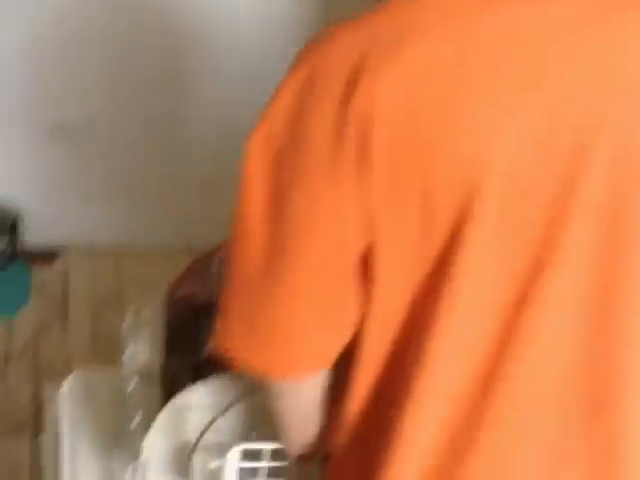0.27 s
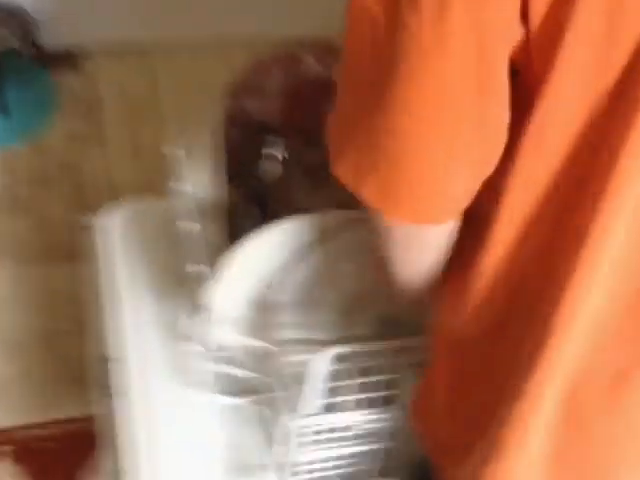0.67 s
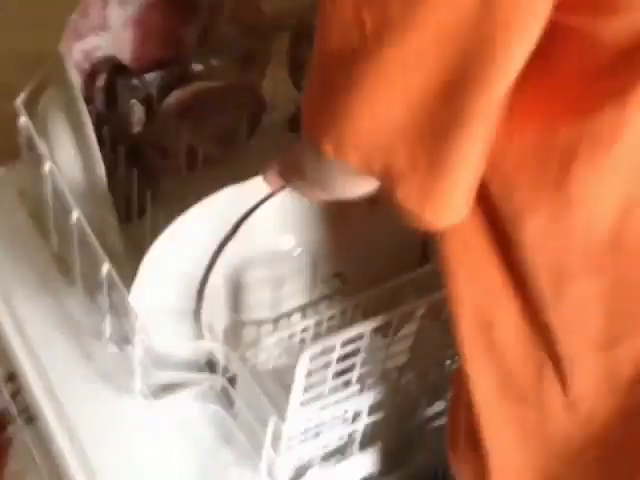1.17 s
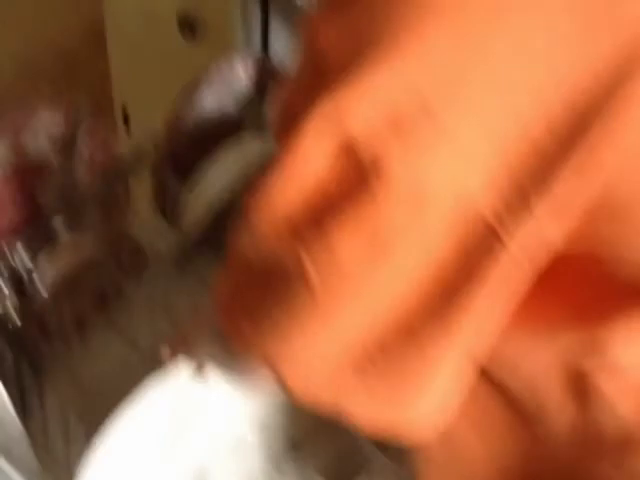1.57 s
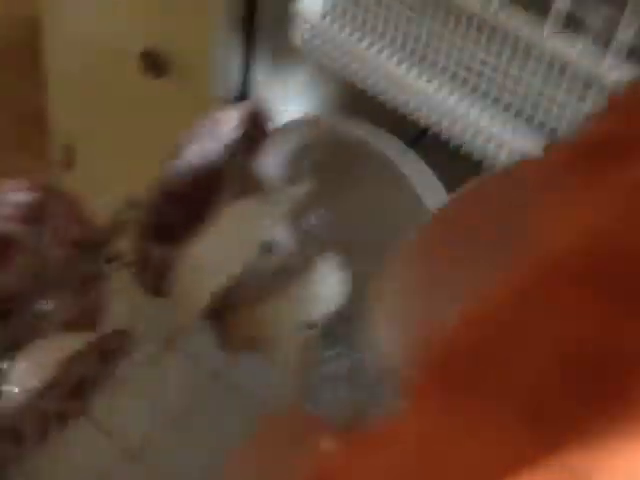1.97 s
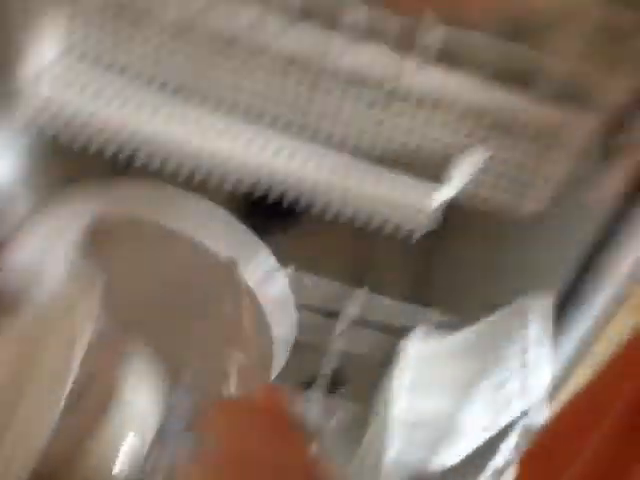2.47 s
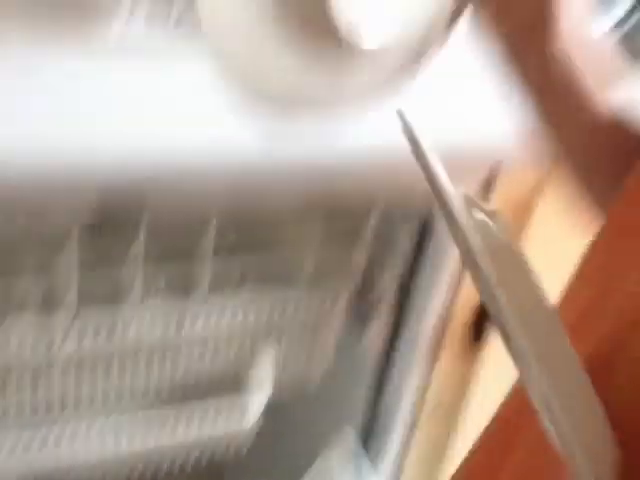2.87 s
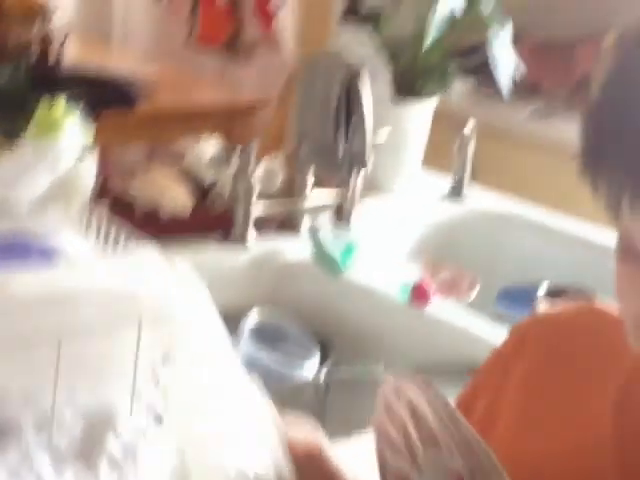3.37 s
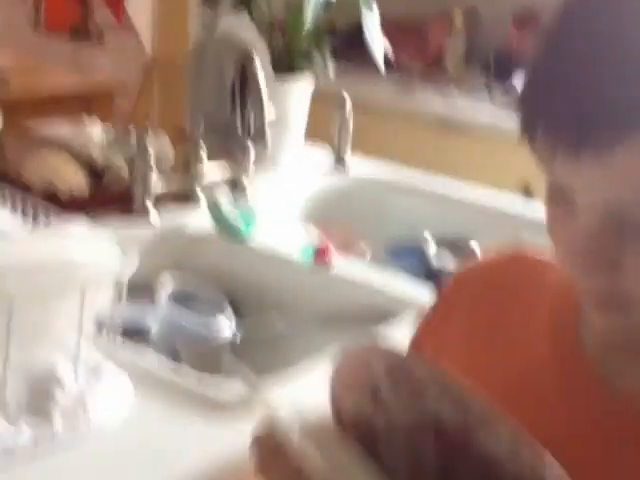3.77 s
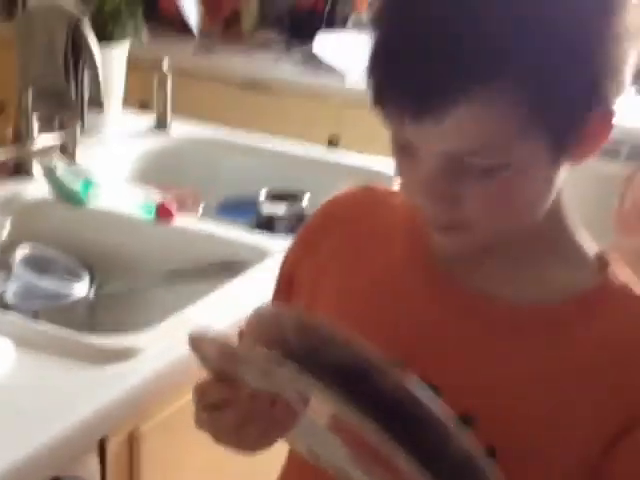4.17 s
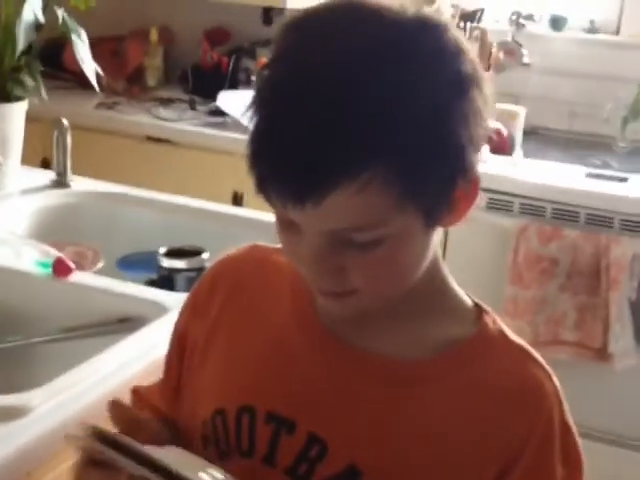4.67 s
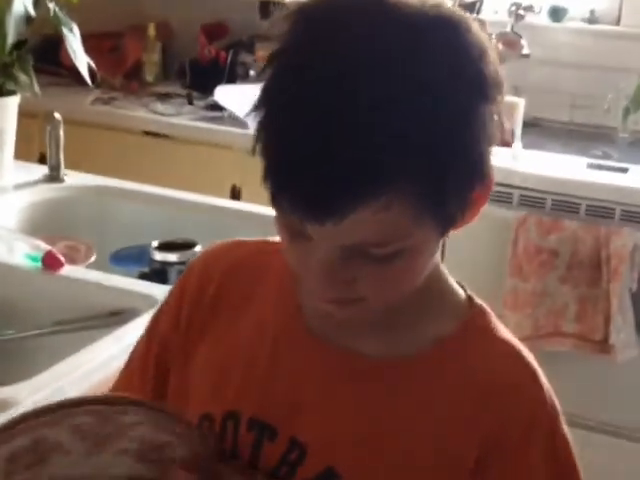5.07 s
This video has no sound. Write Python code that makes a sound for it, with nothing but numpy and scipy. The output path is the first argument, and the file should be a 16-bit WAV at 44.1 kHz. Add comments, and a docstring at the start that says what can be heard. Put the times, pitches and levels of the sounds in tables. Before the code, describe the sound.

Dishes being unloaded by hand in a home kitchen: a rattly rack knock, clustered ceramic clinks with short ringing, one sharp bowl strike, a near-quiet moment with soft sleeve swishes, then two strong clacks of plates being stacked and faint china touches. Recorded close on a small, thin-sounding microphone, with lively short reverberation and a faint rumble that lessens.

```python
"""Stacking china in a small kitchen

China plates are lifted out of a dishwasher rack and stacked by hand. Each contact is a clack of
filtered noise plus a ring of decaying sine pairs. Loose dishes chatter in runs of light contacts.
The rack thuds and hands or sleeves brush past, both as shaped noise. Echoes made of random pulses
and fading noise form the hard room, over a low background rumble.
"""
import sys
import numpy as np
from scipy import signal
from scipy.io import wavfile

SR = 44100
rng = np.random.default_rng(int(sys.argv[2]) if len(sys.argv) > 2 else 0)


def waveform_to_disk(signal):
    """Save audio, clipped to [-1, 1], as 16-bit WAV at the path in sys.argv[1]."""
    frames = np.transpose(np.atleast_2d(signal))
    scaled = np.clip(frames, -1, 1) * 32767
    samples = np.round(scaled).astype(np.int16)
    wavfile.write(sys.argv[1], SR, samples)


N = 234719  # length in samples

# Colour of the house background. Each row: frequency in Hz, level in dB per Hz.
BACKGROUND_COLOUR = [(30, -32), (70, -19), (110, -9), (170, -1), (280, 0), (420, -5), (600, -11),
                     (1200, -15), (2500, -17), (4000, -21), (6500, -24), (9000, -34), (15500, -35)]
# How the background level moves. Each row: time in seconds, level in dB.
BACKGROUND_LEVEL = [(0, -56.5), (1.9, -56), (2.9, -61.5), (5.3, -66)]

# Colour of dry friction. Each row: frequency in Hz, level in dB per Hz.
RUB_COLOUR = [(350, -30), (600, -1.5), (775, 0), (974, -7.5), (1990, -5), (3190, -7.5), (6690, -6),
              (10600, -25.5), (15000, -21.5)]
# A hand or sleeve brushing past the dishes. Each row: start in seconds, length in seconds,
# level in dB, rise in seconds, fade in dB per second.
RUB_STROKES = [(0, 0.18, -66, 0.012, 3), (0.985, 0.041, -62, 0.003, 39.5), (3.038, 0.083, -56, 0.0088, 3.5),
               (3.119, 0.22, -59.5, 0.039, 18.5), (3.692, 0.058, -58.5, 0.048, 2),
               (4.338, 0.058, -52.5, 0.027, 38)]

# Loose dishes jostling in runs of light ticks. Each row: start in seconds, length in seconds,
# dish name, relative level in dB, brightness in dB per octave.
JOSTLE_RUNS = [(0.036, 0.13, "loose plate", -49, -4), (0.172, 0.025, "loose plate", -42.5, 2),
               (0.337, 0.081, "rack", -55, -4.5), (0.551, 0.053, "rack", -43, -4),
               (1.799, 0.14, "plate", -44.5, -6), (1.994, 0.051, "bowl", -50.5, 0),
               (2.109, 0.06, "bowl", -48.5, 0), (4.21, 0.051, "side plate", -50.5, 1)]
TICKS_PER_S, TICK_FADE_DB_PER_S, TICK_SPREAD_DB = 50, 47.5, -1.5  # uneven ticks that die down
TICK_SOFT_DB, TICK_RISE_S = 3, 0.023  # a jostle starts gently and soon swells
TICK_RING_DB, TICK_CHATTER_S = -7.5, 0.012  # light contacts are loose and ring faintly

# Soft, dull knocks on the rack or on a dish in the hand. Each row: time in seconds, relative level in dB.
SOFT_KNOCKS = [(0.055, -40), (0.163, -42), (0.566, -43), (0.612, -19.5), (0.986, -49.5), (1.774, -45),
               (2.019, -50), (3.015, -45.5), (3.942, -44.5)]
# Colour of a thud. Each row: frequency in Hz, level in dB per Hz.
THUD_COLOUR = [(40, -34.5), (95, -14.5), (155, -4), (220, -2.5), (330, -6), (600, -12.5), (2000, -31.5),
               (12000, -60.5)]
# Dishes whose clear contacts also shake the rack: a list of dish names.
DISHES_IN_RACK = ("saucer", "plate", "rim", "bowl", "side plate")
RACK_SHARE_DB = -25.5  # added to the listed level of a contact to get the listed level of its thud

# Clear contacts. Each row: time in seconds, dish name, relative level in dB,
# relative ring against clack in dB, brightness in dB per octave, chatter length in seconds.
CLEAR_CONTACTS = [ (0.056, "loose plate", -54, 5, -5, 0.0081), (0.111, "loose plate", -53, -9, 1.5, 0.0091),
                  (0.444, "side plate", -52.5, -9, 3.5, 0.0038), (0.585, "rack", -45, 1, 2, 0.029),
                  (0.602, "rack", -23, -6, 2.5, 0.008), (0.61, "rack", -17.5, -12.5, 1, 0.0095),
                  (0.62, "rack", -17, -11, 2, 0.022), (0.648, "rack", -25, -5, 3, 0.021),
                  (0.684, "rim", -36, 0, 1, 0.019), (0.759, "side plate", -39.5, -13, 6.5, 0.014),
                  (1.19, "pair", -33, -18.5, -1, 0.0056), (1.252, "loose plate", -48.5, 1, -2.5, 0.0078),
                  (1.352, "saucer", -21.5, -6, 0, 0.0056), (1.364, "saucer", -22.5, -5, -1, 0.0074),
                  (1.493, "plate", -27.5, 3.5, 0.5, 0.0066), (1.511, "plate", -19.5, -2, 0.5, 0.026),
                  (1.554, "plate", -23, -10, -0.5, 0.019), (1.669, "rim", -23.5, -9, 2, 0.011),
                  (1.687, "rim", -27.5, 1.5, -1.5, 0.019), (1.719, "rim", -28.5, -5.5, 1, 0.0077),
                  (1.754, "rim", -34, 1, -3, 0.013), (2.028, "saucer", -39, -12.5, 0, 0.01),
                  (2.164, "rim", -39.5, -4.5, -3, 0.006), (2.269, "bowl", -42, 8.5, 3.5, 0.0093),
                  (2.282, "bowl", -18, -6.5, 2.5, 0.0079), (2.306, "bowl", -26, 2.5, 0, 0.012),
                  (2.321, "bowl", -30, -4.5, 1, 0.0086), (2.49, "side plate", -35, -3.5, -1, 0.005),
                  (2.551, "stack", -42.5, -13.5, -6.5, 0.0064), (2.603, "saucer", -45, -16.5, -5, 0.01),
                  (2.642, "bowl", -50.5, -20.5, 0, 0.014), (2.703, "deep plate", -47.5, -2.5, -4, 0.009),
                  (3.261, "small plate", -38.5, -4.5, -1.5, 0.013),
                  (3.942, "pair", -18, -4.5, -1.5, 0.0067), (3.957, "pair", -27.5, 0, 0.5, 0.011),
                  (4.016, "pair", -29, -5.5, -1, 0.0049), (4.476, "pair", -31.5, -2, -2, 0.01),
                  (4.502, "stack", -19, -6, -1, 0.0068), (4.54, "stack", -20, -8, -0.5, 0.024),
                  (4.603, "stack", -33.5, -6, -2, 0.017), (4.8, "top plate", -50.5, -1.5, -5.5, 0.017),
                  (4.839, "stack", -46.5, -6, -7, 0.018), (4.864, "stack", -51.5, -2, -4, 0.0077),
                  (4.993, "stack", -52, -6, -2, 0.0072), (5.017, "stack", -44.5, -4.5, -1, 0.0069),
                  (5.032, "top plate", -36, -6, -2, 0.011), (5.221, "stack", -49.5, -4, -4.5, 0.0054),
                  (5.277, "loose plate", -52, 1.5, -5, .018)]
# Dense, quickly damped modes of each dish, by name. Each row: frequency in Hz, level in dB per Hz.
CLACK_COLOUR = { "rack": [(53, -48), (90, -24), (179, 3), (300, -2.5), (420, -3), (515, 1), (653, -5.5),
                (883, -1), (1190, -10.5), (2770, -8.5), (4080, -15.5), (4640, -12.5), (9240, -29),
                (14200, -51), (15500, -32)], "saucer": [(150, -57), (250, -32.5), (635, -15.5), (929, -5.5),
                (1160, -13.5), (1920, -5.5), (2900, -9.5), (4240, -11.5), (4790, -11), (5220, -25),
                (6210, -12), (13700, -47.5), (15500, -49)], "plate": [(150, -52), (250, -27), (795, -9.5),
                (897, -5.5), (1790, -12.5), (2020, -6), (2950, -12), (3220, -8), (5600, -9.5),
                (7000, -12.5), (8770, -18), (9230, -47), (15500, -32.5)], "rim": [(150, -50.5), (250, -34),
                (593, -15.5), (1760, -15), (2620, -7.5), (3330, -18.5), (3510, -4), (4100, -12.5),
                (5690, -13.5), (9230, -32.5), (15500, -44.5)], "bowl": [(120, -38), (200, -34), (618, -8.5),
                (769, -13), (1010, -5.5), (1560, -15.5), (2020, -3), (2300, -14.5), (4750, -13),
                (5700, -15), (15500, -45.5)], "pair": [(180, -60), (300, -33.5), (526, -27), (562, -17.5),
                (937, -3), (1240, -13), (1940, -7.5), (2210, -8.5), (2610, -8.5), (3280, -8), (3450, -5),
                (3940, -6.5), (6900, -11.5), (9290, -24.5), (15500, -42.5)], "stack": [(180, -57.5),
                (300, -35), (620, -14), (794, -9), (922, -5.5), (1180, -14), (1780, -8), (2790, -10),
                (3570, -9), (4210, -18.5), (4570, -3), (5050, -24.5), (6150, -16), (8140, -32), (9140, -49),
                (15500, -54)]}
# The clack shared by the remaining, lightly struck plates. Each row: frequency in Hz, level in dB per Hz.
PLAIN_CLACK_COLOUR = [(150, -61.5), (250, -22.5), (600, -24), (961, -13.5), (1500, -18.5), (2760, -18),
                      (4790, -21), (7000, -30), (15500, -61)]
# Clear ringing modes of each dish, by name. Each row: frequency in Hz, relative level in dB.
RING_MODES = { "rack": [(224, -4), (340, -3), (514, 0), (612, -3), (875, -6), (997, -5), (1898, -7),
              (2141, -6), (2402, -6), (2572, -6), (2715, -4), (2814, -4), (3099, -4), (3137, -3),
              (3494, -6), (4507, -4), (4540, -3), (4660, -1), (5428, -10), (6150, -6), (6831, -5),
              (8214, -19)], "saucer": [(847, -12), (950, -11), (1005, -9), (1079, -12), (1230, -13),
              (1958, -12), (2145, -14), (2550, -11), (2865, -5), (2981, -9), (3305, -12), (3636, -12),
              (3854, -11), (4638, 1.5), (4945, -6), (5585, -12)], "plate": [(879, -13), (1003, -14),
              (1975, -11), (2036, -8), (2528, -4), (2577, -5), (2710, -1), (2950, -4), (2975, 0),
              (3494, -10), (3622, -8), (4506, -12), (4608, -11), (4759, -14), (5190, -11), (5280, -12),
              (6059, -16), (6779, -11), (6837, -5), (8761, -15)], "rim": [(1003, -20), (1280, -20),
              (1918, -12), (2017, -15), (2560, -7), (2713, -11), (2942, -10), (3500, 2), (3572, -13),
              (4486, -13), (4546, -9), (5588, -9), (6068, -12), (6841, -15), (7872, -17), (8246, -19),
              (8700, -21)], "bowl": [(1091, -13), (1320, -8), (1672, -12), (1802, -11), (1978, -5),
              (2075, -8), (2396, 3), (2803, -3), (2947, -9), (3257, -10), (3587, -13), (3872, -5),
              (4560, -12), (4799, -4), (4908, -9), (5400, -13), (6020, -12), (6356, -9), (7040, -15),
              (7379, -14), (8192, -20)], "side plate": [(754, -11), (891, -12), (982, -4), (1322, -9),
              (1982, -1), (2098, -2), (2814, -5), (3262, -8), (3518, -11), (3864, -11), (4661, -5),
              (4928, -6), (6110, -15), (6788, -16)], "loose plate": [(991, 0), (1072, -10), (1400, -17),
              (1857, -18), (2579, -13), (3050, -18), (3666, -21), (4800, -19), (6137, -18), (8250, -25)],
              "deep plate": [(750, 0), (1039, 0), (1373, -8), (2000, -13), (2853, -10)],
              "small plate": [(750, -5), (886, -4), (1024, -4), (1958, -2), (2020, -5), (2821, -2),
              (3400, -8), (3860, -4), (4550, -6), (7063, -9)], "top plate": [(732, -6), (900, -4),
              (1000, 0), (1378, -8), (1820, -4), (2369, -4), (3052, -6), (3424, -7), (3746, -9),
              (4650, -10), (6799, -15)], "stack": [(846, -8), (899, -2), (946, -6), (990, -3), (1610, -12),
              (1791, -3), (1970, -4), (2331, -7), (2453, -4), (2526, -7), (2594, -4), (2922, -9),
              (3424, -7), (3455, -5), (3675, -7), (3747, -5), (4550, -7), (4600, -6), (4690, -10),
              (6020, -12), (6080, -9), (6750, -19), (7917, -14)], "pair": [(868, -10), (945, -1),
              (1902, -7), (2414, -11), (2530, -4.5), (2679, -6), (2954, -6), (2988, -6), (3495, -2),
              (4565, -5), (4988, -3.5), (5110, -9), (5400, -11), (5650, -12), (6054, -7), (6681, -13),
              (6825, -7), (6900, -11), (8203, -22), (8700, -15)]}
# High overtones that all the china shares. Each row: frequency in Hz, relative level in dB.
HIGH_OVERTONES = [(9646, -8), (9792, -1), (9939, -8), (10423, -6), (10804, -9), (11195, -6), (11370, -7),
                  (11793, -6), (12458, -5), (13278, -3), (13750, -6), (14058, -7), (14404, -7), (14975, -6)]
# How each dish rings, by name. Each row: time in seconds to fade by 60 dB at 2500 Hz,
# relative level of the overtones against the clear modes in dB.
DISH_RINGING = {"rack": (0.14, -20), "saucer": (.12, -23), "plate": (0.27, -23), "rim": (.3, -21),
                "bowl": (.22, -26), "side plate": (0.21, -30), "pair": (.19, -21), "stack": (.26, -29),
                "loose plate": (.22, -29), "deep plate": (.15, -30), "small plate": (.2, -28),
                "top plate": (.28, -32)}
# Grip and point of contact change the modes from blow to blow.
GRIP_DETUNE, PLACE_SPREAD_DB = 0.0018, 1.1  # share of pitch, dB

# How long the room tail lasts. Each row: frequency in Hz, time in seconds to fade by 60 dB.
ROOM_FADE_TIMES = [(150, 0.34), (500, 0.39), (1500, 0.39), (4000, 0.36), (8000, 0.34), (15000, 0.13)]
TREBLE_EDGE_HZ = 15500


def amp(db):
    """Turns decibels into gain."""
    return 10 ** (np.asarray(db) / 20)


def unit(x):
    """Scales a sound to energy 1."""
    return x / np.sqrt(np.sum(x ** 2) + 1e-20)


def fade_60db(t, t60):
    """A smooth fade that has lost 60 dB after t60 seconds."""
    return np.exp(-np.log(1000) * t / t60)


def read(points, hz):
    """Reads between the rows of a table, on a log-frequency axis."""
    f, value = np.transpose(points)
    return np.interp(np.log(hz + 1), np.log(f + 1), value)


def add(mix, s, sound):
    """Lays a sound into the mix at time s in seconds."""
    part = mix[max(round(s * SR), 0):][:len(sound)]
    part += sound[:len(part)]


def tilt(hz, tilt_db):
    """Harder contacts lift the treble, softer ones lose it; the pivot is 2500 Hz, flat below 500 Hz."""
    return tilt_db * np.log2(np.maximum(hz, 500) / 2500)


def colour(x, points, tilt_db=0, size=4096):
    """Gives a sound the listed spectrum with a filter that never acts ahead of its input."""
    hz = abs(np.fft.fftfreq(size, 1 / SR))
    gain_db = np.maximum(read(points, hz), -80) + tilt(hz, tilt_db)
    # the Hilbert transform of the log gain gives the phase that makes the filter causal
    spectrum = np.exp(np.conj(signal.hilbert(np.log(amp(gain_db)))))
    taps = np.fft.ifft(spectrum).real
    return signal.fftconvolve(x, taps[:size // 2])[:len(x)]


def background():
    """Low rumble that follows the stir in the room, and a faint hiss that follows it half as far."""
    noise = unit(colour(rng.standard_normal(N), BACKGROUND_COLOUR)) * np.sqrt(N)
    stir_db = np.interp(np.arange(N) / SR, *np.transpose(BACKGROUND_LEVEL))
    rumble = signal.filtfilt(*signal.butter(2, 900, fs=SR), noise)
    hiss = noise - rumble
    hiss_db = (stir_db + stir_db.min()) / 2
    return rumble * amp(stir_db) + hiss * amp(hiss_db)


def rubs(release=0.029, grain_db=1.0):
    """Each brushing stroke is a fine-grained friction hiss that swells, fades and lifts off."""
    out = np.zeros(N)
    t = np.arange(SR // 2) / SR
    for start, length, level_db, rise, fade_db_per_s in RUB_STROKES:
        noise = rng.standard_normal(len(t))
        # the level makes a small random step every 64 samples
        steps = np.repeat(rng.standard_normal(len(t)), 64)[:len(t)]
        grains = noise * amp(grain_db * steps)
        hiss = unit(colour(grains, RUB_COLOUR)) * np.sqrt(len(t))
        lift_off = np.exp(-np.maximum(t - length, 0) / release)
        stroke = np.minimum(t / rise, 1) * lift_off
        add(out, start, hiss * stroke * amp(level_db - fade_db_per_s * t))
    return out


def jostles():
    """Each jostle is a run of light contacts at uneven times that swells briefly, then grows weaker."""
    for start, length, dish, level_db, bright_db in JOSTLE_RUNS:
        count = max(round(length * TICKS_PER_S), 1)
        ages = length * (np.arange(count) + rng.random(count) / 2) / count
        for age in ages - ages[0]:
            swell_db = -TICK_SOFT_DB * np.exp(-age / TICK_RISE_S) - TICK_FADE_DB_PER_S * age
            tick_db = level_db + swell_db + TICK_SPREAD_DB * rng.standard_normal()
            yield start + age, dish, tick_db, TICK_RING_DB, bright_db, TICK_CHATTER_S


def rack(t60=0.15):
    """Soft knocks give a short, low thud; so does the loaded wire rack when a dish in it is struck."""
    out = np.zeros(N)
    t = np.arange(SR // 3) / SR
    shakes = [(s, db + RACK_SHARE_DB) for s, dish, db, *_ in CLEAR_CONTACTS if dish in DISHES_IN_RACK]
    for s, db in SOFT_KNOCKS + shakes:
        push = rng.standard_normal(len(t)) * fade_60db(t, t60)
        add(out, s, amp(db + 21.0) * unit(colour(push, THUD_COLOUR)))
    return out


def modes(table, t60, bright_db, contacts, split=0.006, twin=0.84, damping_slope=0.23,
          held_hz=950, hold=0.33):
    """Contacts ring each mode as a close pair that beats; high modes die sooner, held low ones too."""
    t = np.arange(SR // 3) / SR
    hz, db = np.transpose(table)[:, :, None]
    place, gap, side, grip = rng.standard_normal((len(table), 4)).T[:, :, None]
    turn = 2 * np.pi * hz * (1 + GRIP_DETUNE * grip) * t
    lower = np.sin(turn * (1 - split * gap / 2))
    upper = np.sin(turn * (1 + split * gap / 2))  # gap may be negative, which swaps the two
    pair = np.sign(side) * (lower + twin * upper)
    # the hold damps the lowest bending mode, near held_hz
    held = min(hold, .9) * np.exp(-(2 * np.log2(hz / held_hz)) ** 2)
    life = t60 * (2500 / hz) ** damping_slope * (1 - held)
    hits = np.trim_zeros(contacts)[None]
    rings = signal.fftconvolve(fade_60db(t, life) * pair, hits, axes=1)[:, :len(t)]
    rings = rings / np.linalg.norm(rings, axis=1, keepdims=True)
    mode_db = db + PLACE_SPREAD_DB * place + tilt(hz, bright_db)
    return unit(np.sum(amp(mode_db) * rings, 0))


def blow(dish, level_db, ring_db, bright_db, chatter, clack_t60=0.045, crack=1.3,
         rebound_db=-8, slide_db_per_s=280, count=5):
    """A first contact and a few rebounds, stronger in a long slide, excite a dish's clack and ring."""
    t = np.arange(SR // 3) / SR
    delays = max(chatter, .001) * (np.arange(count) + rng.random(count)) / count
    places = np.minimum(delays * SR, len(t) - 1).astype(int)
    contacts = np.zeros(len(t))
    contacts[places] = amp(rebound_db + slide_db_per_s * chatter + 2.5 * rng.standard_normal(count))
    contacts[0] = 1

    def dying(t60):
        """Every contact adds energy, which then leaks away."""
        energy_kept = np.exp(-2 * np.log(1000) / (t60 * SR))  # share kept from sample to sample
        return np.sqrt(signal.lfilter([1], [1, -energy_kept], contacts ** 2))

    envelope = dying(clack_t60) + crack * dying(0.0023)
    clack_points = CLACK_COLOUR.get(dish, PLAIN_CLACK_COLOUR)
    clack = colour(rng.standard_normal(len(t)) * envelope, clack_points, bright_db)
    # the top treble lives mostly in separate overtones: rows of Hz, dB
    clack = colour(clack, [(7000, 1.0), (9500, 0.29)])

    t60, overtones_db = DISH_RINGING[dish]
    clear = modes(RING_MODES[dish], t60, bright_db, contacts)
    overtones = modes(HIGH_OVERTONES, t60, 0, contacts)
    ring = clear + amp(overtones_db + 2 * bright_db) * overtones
    # a dish radiates little below its lowest mode
    baffle = signal.butter(2, RING_MODES[dish][0][0] / 2, "high", fs=SR)
    ring = signal.lfilter(*baffle, ring)
    return amp(level_db + 22.5) * np.array([unit(clack), amp(ring_db + 9.5) * unit(ring)])


def dishes():
    """All clear and jostling contacts, as a clack track and a ring track."""
    clacks, rings = np.zeros((2, N))
    for contacts in (CLEAR_CONTACTS, jostles()):
        for s, *contact in contacts:
            clack, ring = blow(*contact)
            add(clacks, s, clack)
            add(rings, s, ring)
    return clacks, rings


def kitchen(x, early_db=-4, late_db=-2, early_t60=0.021, build=0.0032):
    """Close cupboards throw back a quick cluster of echoes; the room follows with a diffuse tail."""
    t = np.arange(SR * 3 // 4) / SR
    # about 1500 random echoes per second, none in the first 2 ms
    early = rng.standard_normal(len(t)) * (rng.random(len(t)) < 1500 / SR) * (t > .002)
    early = early * fade_60db(t, early_t60)
    # noise whose bands fade at their own pace
    hz, age, bands = signal.stft(rng.standard_normal(len(t)), SR, nperseg=256)
    fading = bands * fade_60db(age, read(ROOM_FADE_TIMES, hz)[:, None])
    late = signal.istft(fading, SR, nperseg=256)[1][:len(t)]
    late = late * (1 - np.exp(-t / build))
    echoes = amp(early_db) * unit(early) + amp(late_db) * unit(late)
    return signal.fftconvolve(x, echoes)[:N]


def scene(ring_room_db=-7):
    """Clacks, thuds and rubs fill the kitchen; the ring of the nearby dishes arrives mostly direct."""
    clacks, rings = dishes()
    knocks = clacks + rack() + rubs()
    room = kitchen(knocks + amp(ring_room_db) * rings)
    return (knocks + rings + room + background())[None]


def record(dry, bass_cut_hz=85):
    """A small microphone loses the deep bass and the highest treble."""
    bass_cut = signal.butter(2, bass_cut_hz, "high", fs=SR, output="sos")
    thin = signal.sosfilt(bass_cut, dry)
    treble_cut = signal.firwin(511, TREBLE_EDGE_HZ, window=("kaiser", 9), fs=SR)
    return signal.oaconvolve(thin, treble_cut[None], "same")


dry = scene()
out = record(dry)
waveform_to_disk(out)
```